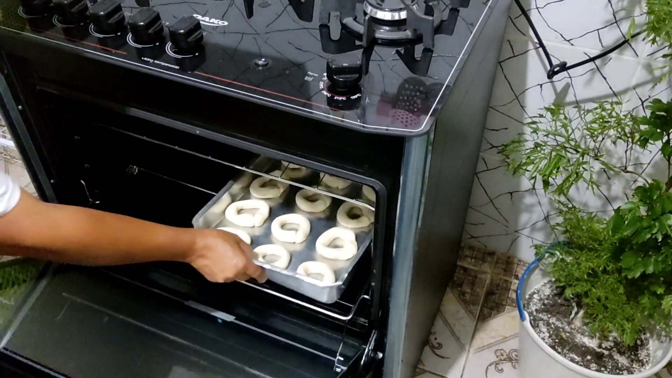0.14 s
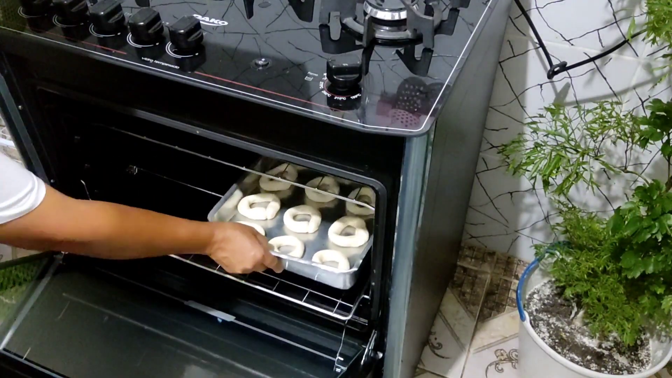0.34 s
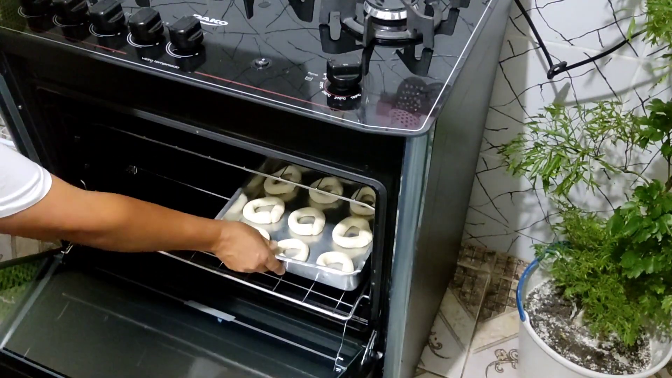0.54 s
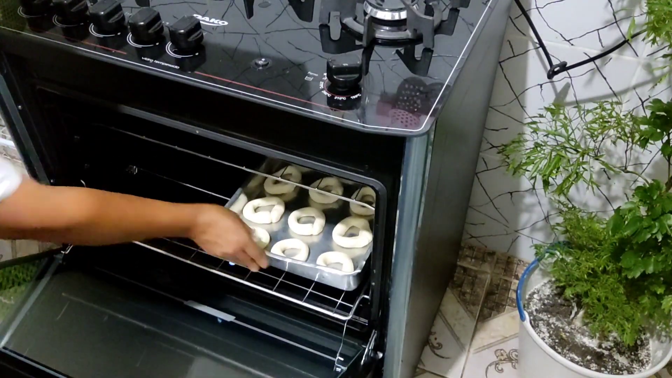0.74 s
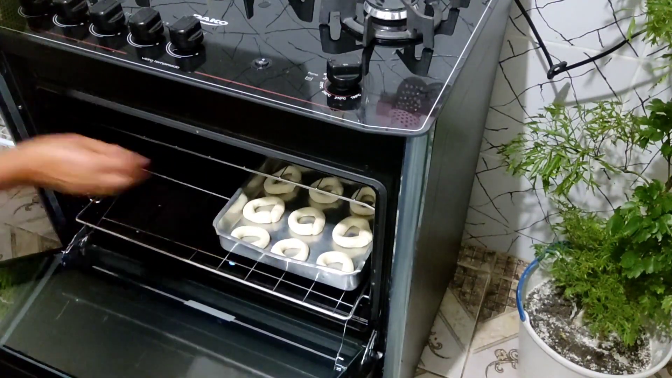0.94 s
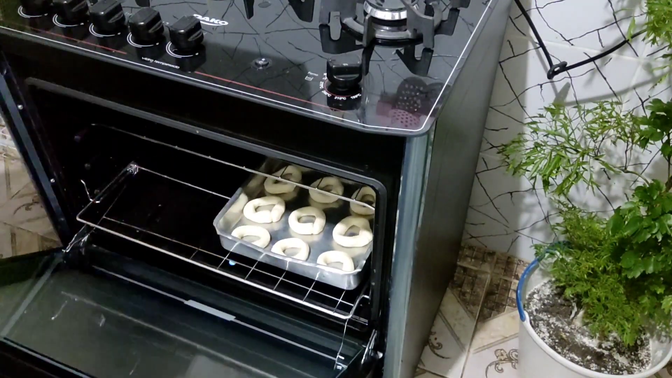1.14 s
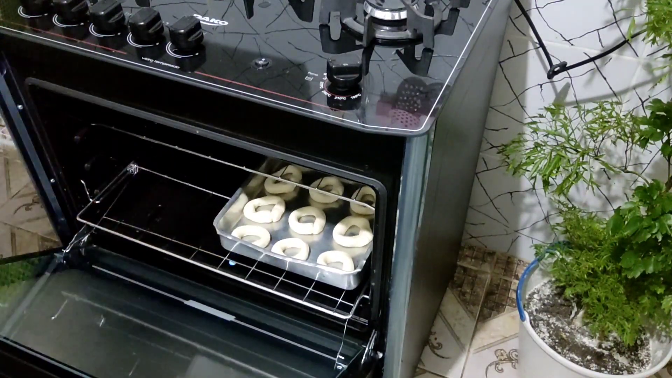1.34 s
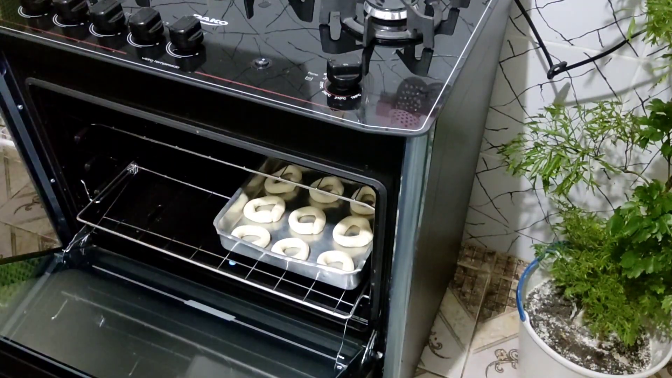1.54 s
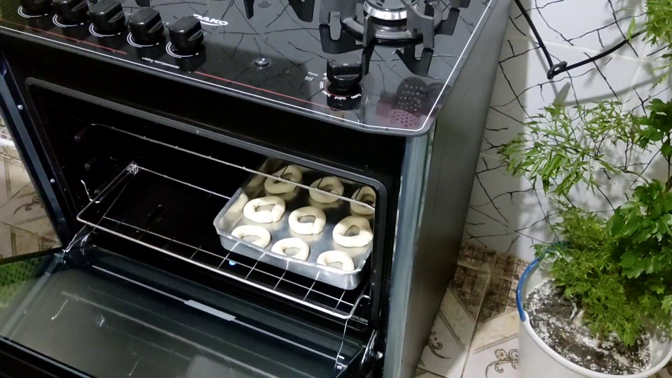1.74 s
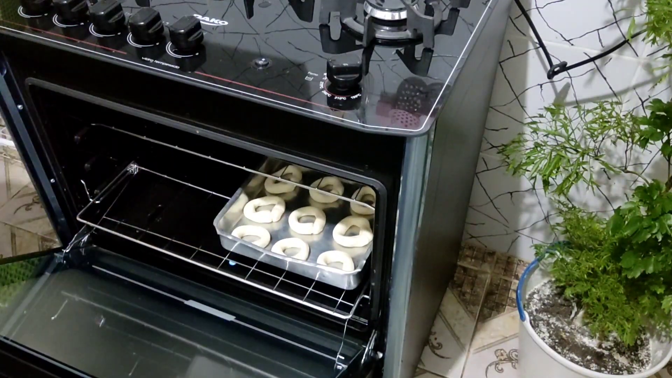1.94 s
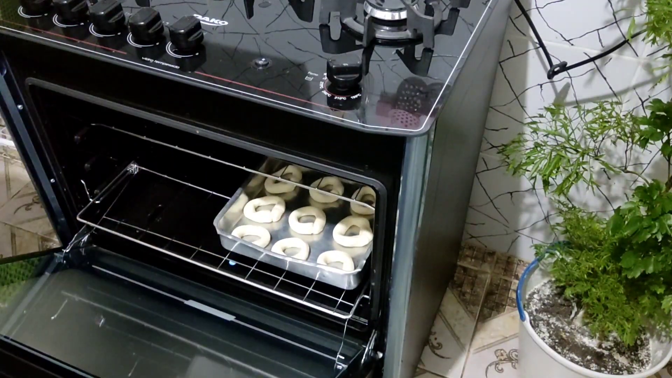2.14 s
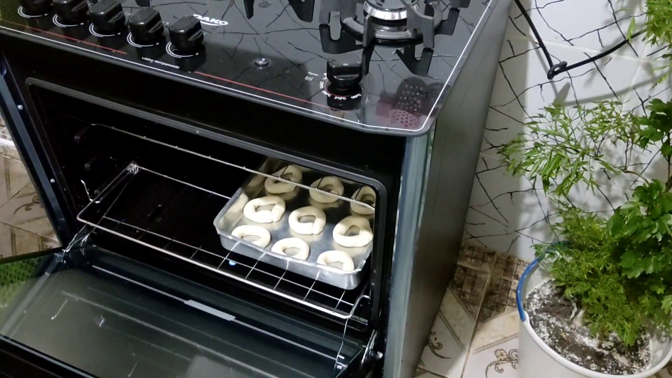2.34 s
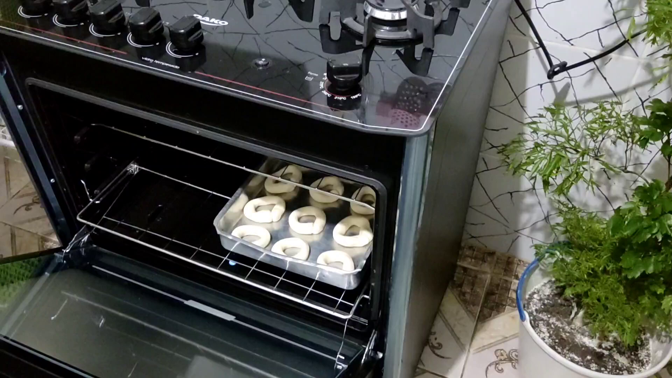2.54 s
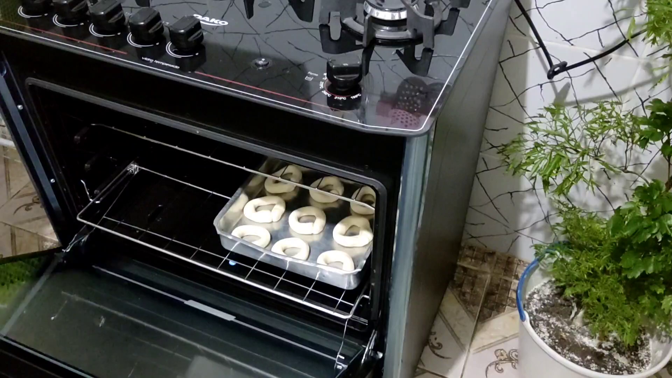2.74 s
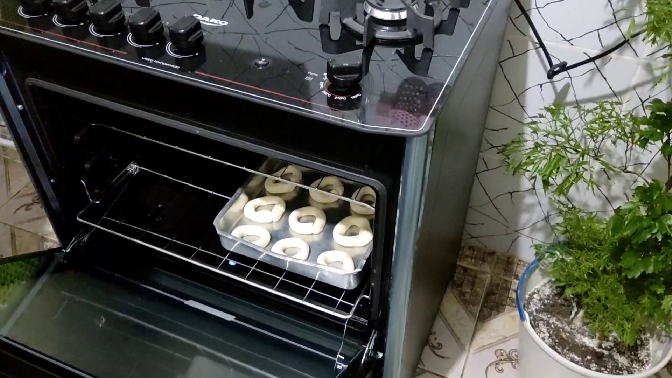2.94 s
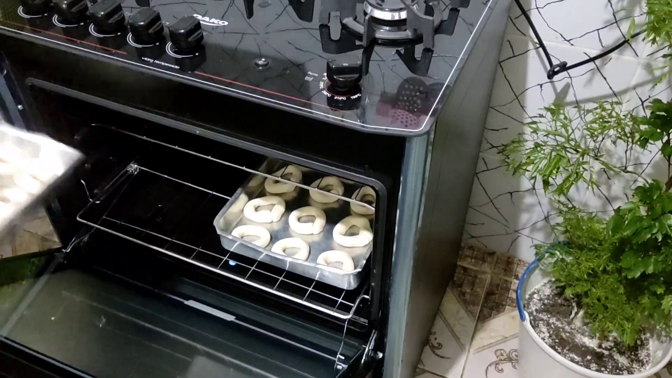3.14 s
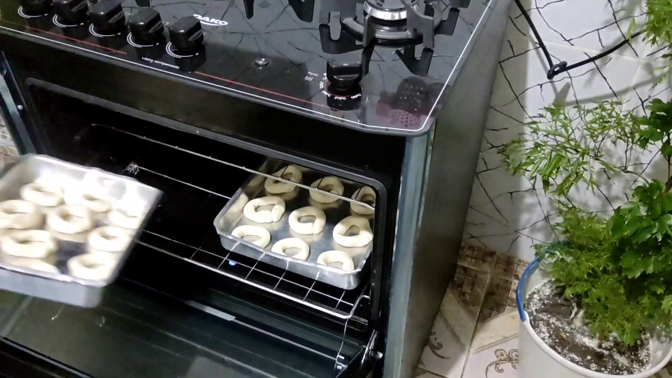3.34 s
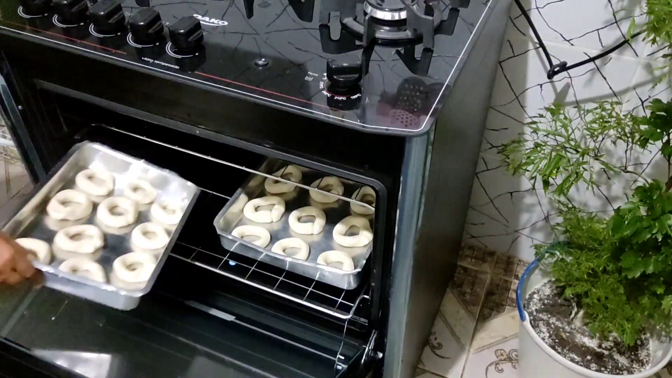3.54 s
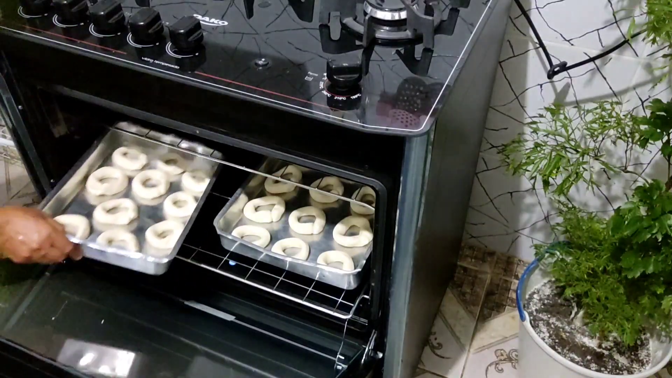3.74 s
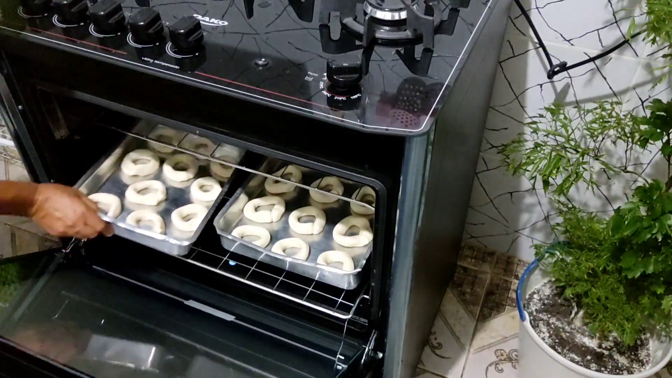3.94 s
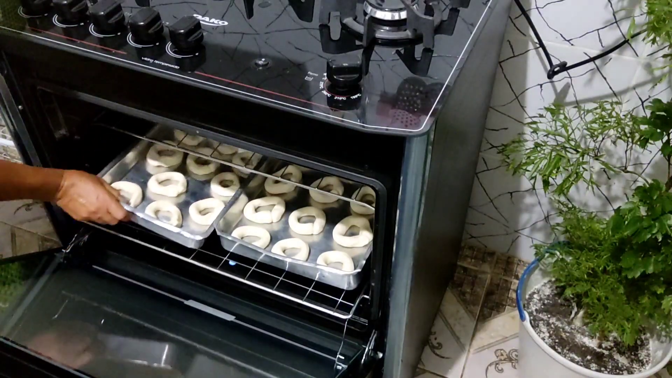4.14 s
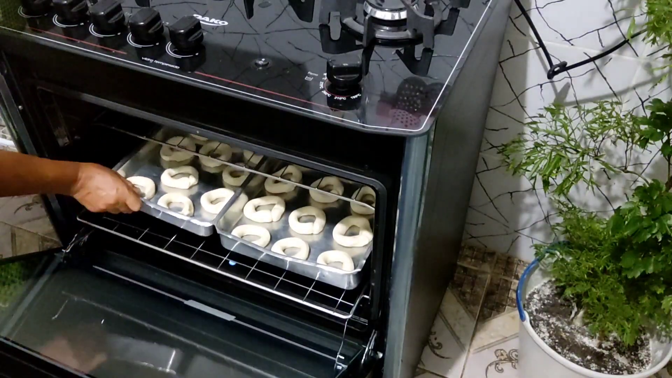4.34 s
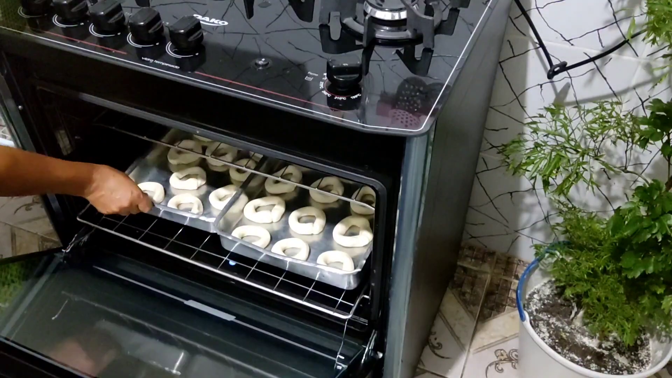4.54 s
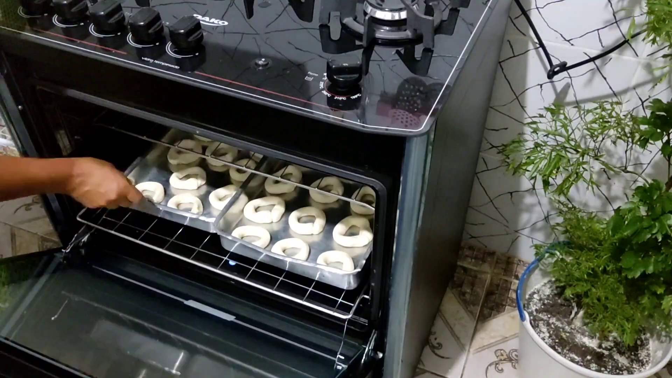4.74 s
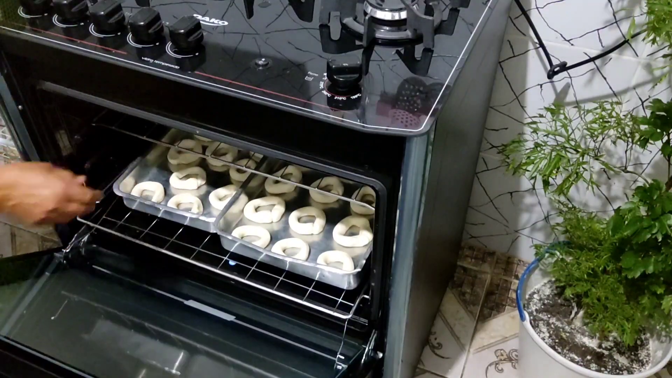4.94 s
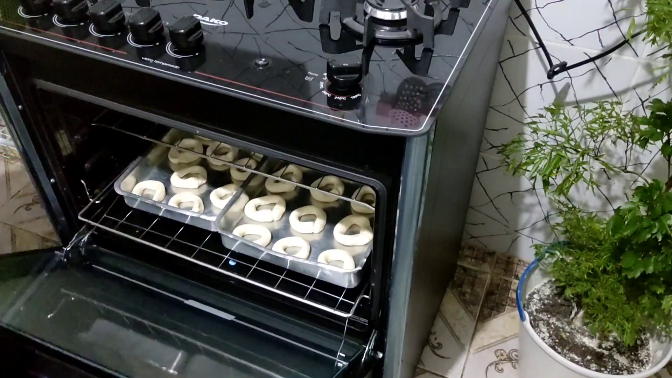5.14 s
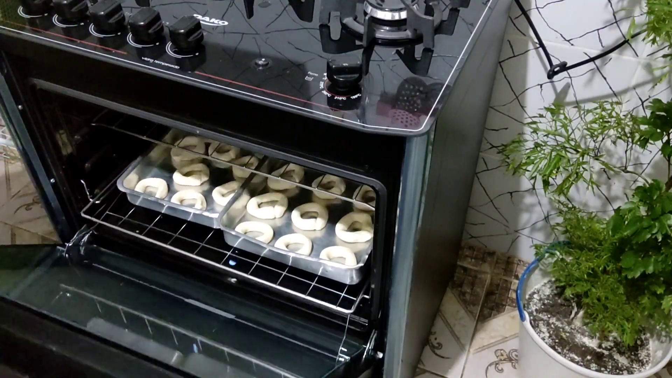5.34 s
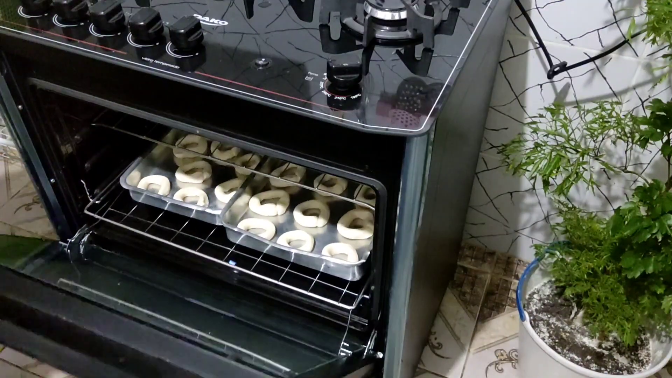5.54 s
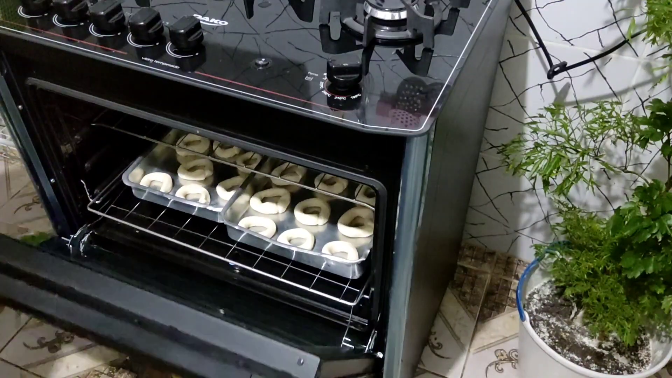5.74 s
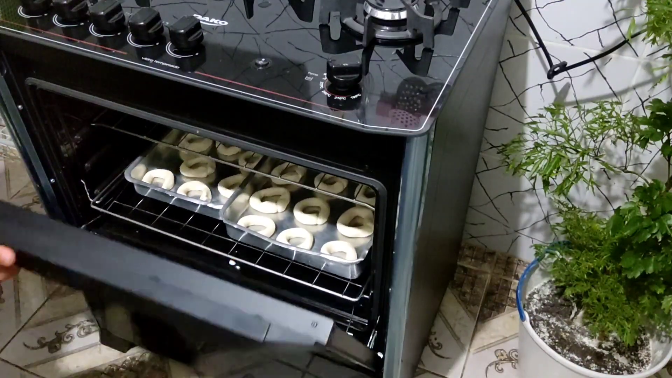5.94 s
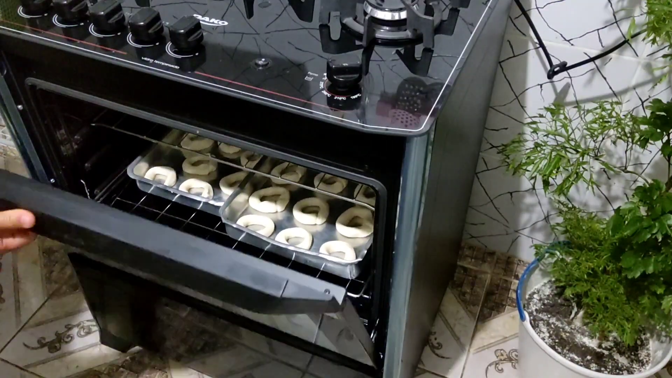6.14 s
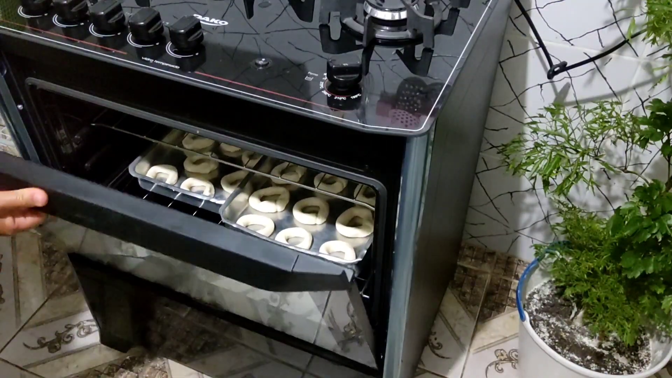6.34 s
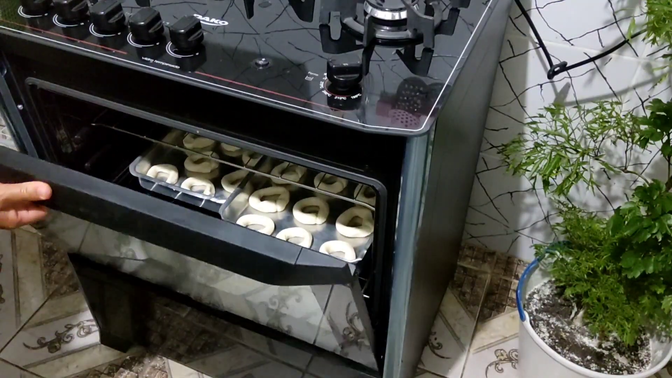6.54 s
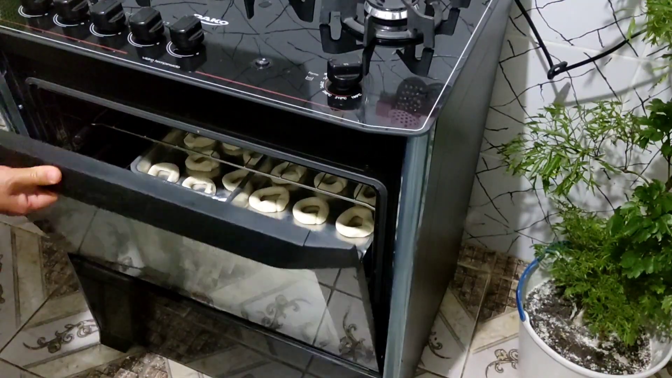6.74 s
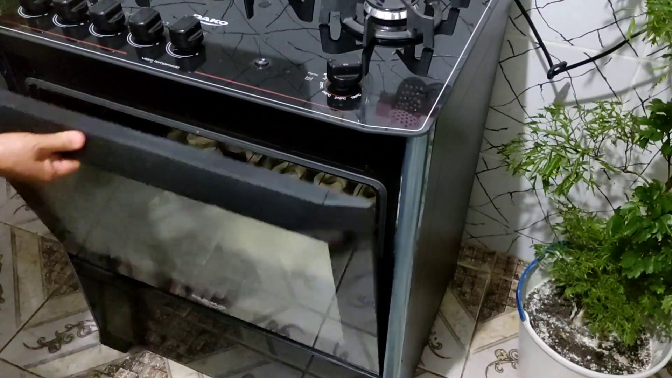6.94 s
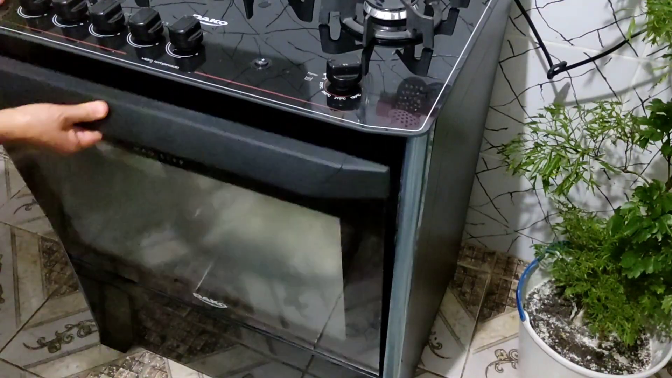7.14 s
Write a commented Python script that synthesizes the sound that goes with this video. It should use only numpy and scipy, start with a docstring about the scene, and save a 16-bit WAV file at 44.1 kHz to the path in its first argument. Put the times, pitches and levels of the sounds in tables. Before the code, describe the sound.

Thin metal tray rattles and slides on oven wires, a sharp off-screen knock, a second tray scrapes in, then quiet door movement.

```python
"""Metal baking trays are set down and slid on the wire rack of an oven, then its door is swung up.
Each blow is a burst of uneven rebounds ringing oven, tray and wires; each slide is dense friction grains.
Something knocks out of sight between the trays, a bare impulse through resonances.
A hard tiled room answers with early arrivals and a decaying noise tail.
Two microphone ports, each with its own treble resonance, hear it over room hiss and air rumble."""
import sys
import numpy as np
from scipy import signal
from scipy.fft import rfft, irfft, next_fast_len
from scipy.io import wavfile
from scipy.ndimage import uniform_filter1d, map_coordinates

SR = 44100
rng = np.random.default_rng(int(sys.argv[2]) if len(sys.argv) > 2 else 0)


def transcribe(u):
    """Save the signal u as a 16-bit wav file named by the first command-line argument.

    u: samples, shape (n,) or (channels, n), limited to [-1, 1]; the rate is SR.
    q: integer samples, one column per channel.
    """
    v = np.clip(np.atleast_2d(u).T, -1, 1)
    q = np.round(v * 32767).astype(np.int16)
    wavfile.write(sys.argv[1], SR, q)


N = 316858  # length in samples

# Contacts of tray, rack and door; levels are for the loudest 10 ms, ahead of the ports.
# Each row: start in seconds, oven boom in dB, boom pitch in Hz, tray clank in dB, wire tick in dB,
# time in seconds for the chatter to fall 60 dB.
CONTACT_EVENTS = [(.077, -29.5, 225, -33, -34, 0.0072), (.16, -38, 240, -46, -25, 0.0038),
                  (.19, -35, 565, -40.5, -44, 0.082), (.249, -35.5, 537, -39.5, -43.5, 0.019),
                  (0.467, -31.5, 207, -26, -21.5, 0.027), (.557, -32, 627, -28.5, -24, 0.0046),
                  (0.604, -29, 264, -22.5, -15, 0.037), (1.298, -63.5, 321, -56, -60, 0.053),
                  (4.076, -58, 700, -39, -36.5, 0.031), (4.142, -38.5, 530, -40.5, -46.5, 0.0032),
                  (4.19, -56, 470, -33.5, -33, 0.047), (4.247, -44.5, 285, -42, -35, 0.039),
                  (4.272, -55, 700, -33.5, -29.5, 0.049), (4.279, -38.5, 219, -41, -22.5, 0.0051),
                  (4.535, -37, 222, -29, -27, 0.061), (4.555, -35, 348, -29.5, -32, 0.042),
                  (5.72, -45, 606, -46.5, -58, 0.011), (5.749, -50, 594.6, -46.5, -47, 0.02),
                  (5.97, -51, 267.2, -51, -56, 0.0086), (6.661, -60.5, 554, -65.5, -61, 0.023),
                  (6.81, -54.5, 500, -53, -61.5, 0.049)]
# Broad ring of the rack wires. Each row: frequency in Hz, relative density in dB per Hz.
WIRE_SPECTRUM = [(2500, -23), (4000, -16), (5500, -2.5), (6300, -5.5), (8000, 2.5), (12000, 0),
                 (15000, -7.5)]
CLEAN_ARRIVAL_DB = -11.5  # each early arrival of a blow without chatter, against the room tail
BLUR_DB_PER_S = 117.5  # early arrivals weaken by this for each second of chatter


def contacts():
    """Each contact booms in the oven shell, clanks in the tray and ticks in the wires."""
    out = np.zeros((2, N + 2 * SR))
    for start, boom_db, boom_hz, clank_db, tick_db, t60 in CONTACT_EVENTS:
        force = chatter(t60)
        answer = room(CLEAN_ARRIVAL_DB - BLUR_DB_PER_S * t60)
        boom = heard(force, answer, oven_shell(boom_hz))
        clank = heard(force, answer, tray_body(tick_db - clank_db))
        tick = heard(force, answer, colour(WIRE_SPECTRUM))
        add(out, start, boom_db, boom)
        add(out, start, clank_db, clank)
        add(out, start, tick_db, tick)
    return out[:, :N]


def chatter(t60):
    """A blow followed by uneven tiny rebounds that die away."""
    t = np.arange(SR // 5) / SR
    rebounds = rng.standard_normal(len(t)) * (rng.random(len(t)) < .07)
    force = rebounds * amp(-60 * t / max(t60, .002))
    force[0] = 2.52  # the first blow
    return force


# Resonances of the oven shell, before the tilt towards the struck spot.
# Each row: centre in Hz, width in Hz, relative level in dB.
OVEN_MODES = [(85, 76, -28), (141.7, 110, -9.5), (177, 65, -8.5), (224.4, 20.3, -1.5), (294, 73, -9),
              (397.4, 85, -0.5), (539, 60, 5.5), (570, 46, 11.5), (684, 95, 1.5)]


def oven_shell(boom_hz):
    """A blow favours the shell modes close to the pitch of the struck spot; the lowest ones always move."""
    favoured = []
    for centre, width, db in OVEN_MODES:
        octaves_away = np.log2(max(centre, 160) / boom_hz)
        favoured.append((centre, width, db - 14 * octaves_away ** 2))
    return modes(favoured)


# Resonances of a tray, before the softness of the contact.
# Each row: centre in Hz, width in Hz, relative level in dB.
TRAY_MODES = [(873, 92, -3.5), (1090, 202, -4), (1523, 1050, -8), (1986, 213, -1.5), (2540, 510, -9.5),
              (3460, 850, -4), (5130, 5600, -11.5)]


def tray_body(hardness_db):
    """A soft contact, with little tick against its clank, drives the upper tray modes less."""
    edge_hz = 5000 * amp(min(hardness_db, 6))
    return lambda f: modes(TRAY_MODES)(f) / (1 + 1j * f / edge_hz) ** 2


# Pushes of a tray along the wires, and a faint shuffle; levels are for full speed, ahead of the room.
# Each row: start in seconds, length in seconds, rub in dB, rumble in dB.
PUSHES = [(.085, 0.11, -61, -39.5), (0.23, .25, -55.5, -47.5), (1.13, 0.092, -60.5, -63),
          (1.29, 0.36, -64.5, -60.5), (4.098, 0.16, -41.5, -46.5), (4.496, 0.049, -44.5, -50.5)]
# The door swings up in two pulls; levels glide from row to row, ahead of the room.
# Each row: time in seconds, hinge rub in dB, rumble in dB.
DOOR_SWING = [(5.099, -98.5, -70.5), (5.4, -68.5, -62), (5.7, -69.5, -62.5), (5.78, -54, -43.5),
              (5.88, -62, -80), (5.95, -52, -49), (6.05, -45, -58.5), (6.22, -49, -73), (6.4, -56, -64),
              (6.58, -67.5, -82), (6.7, -64.5, -61.5), (6.88, -60.5, -58), (7.0, -55, -60.5),
              (7.18, -56.5, -69)]
# Colour of the friction rub. Each row: frequency in Hz, relative density in dB per Hz.
RUB_SPECTRUM = [(300, -23), (1000, -18), (3000, -6.5), (6000, 0.5), (8000, 1.5), (11000, 2), (15000, -3)]
# Colour of the shaken oven shell. Each row: frequency in Hz, relative density in dB per Hz.
SHAKE_SPECTRUM = [(60, -12), (200, -2), (600, -3), (1000, -8), (2500, -15.5), (5000, -21.5)]
RISE, FALL = 0.16, 0.22  # shares of a push spent speeding up and slowing down


def slides():
    """Dense grains of friction hiss, and shake the oven shell."""
    t = np.arange(N) / SR
    times, door_rub_db, door_rumble_db = np.transpose(DOOR_SWING)
    door_moving = t > times[0]
    rub = door_moving * amp(np.interp(t, times, door_rub_db))
    rumble = door_moving * amp(np.interp(t, times, door_rumble_db))
    for start, length, rub_db, rumble_db in PUSHES:
        progress = (t - start) / length
        speed = np.clip(np.minimum(progress / RISE, (1 - progress) / FALL), 0, 1)
        rub = rub + amp(rub_db) * speed
        rumble = rumble + amp(rumble_db) * speed
    rub_sound = rub * unit(filtered(friction_grains(), colour(RUB_SPECTRUM)))
    shake_sound = rumble * unit(filtered(friction_grains(), colour(SHAKE_SPECTRUM)))
    return moving(rub_sound + shake_sound)


def friction_grains():
    """Sparse random impulses, one sample in twenty, as surfaces catch and let go."""
    return rng.standard_normal(N) * (rng.random(N) < .05)


# The knock out of sight, then its late wall echoes; levels are for the loudest 10 ms, ahead of the ports.
# Each row: start in seconds, level in dB.
KNOCK_EVENTS = [(2.037, -17.5), (2.058, -22.5), (2.087, -26)]
# Resonances of the knocked thing; the last two rows are its broad treble, left out of the echoes.
# Each row: centre in Hz, width in Hz, relative level in dB.
KNOCK_MODES = [(455, 160, -18.5), (718, 60, -8), (1200, 131, -2), (1320, 100, -2.5), (1526, 89, -5.5),
               (1900, 42, 6.5), (1887, 15, 11.5), (1975, 180, -2), (2360, 290, -0.5), (2660, 640, -4.5),
               (4430, 8800, -17), (10800, 8000, -18)]


def knock():
    """A dry impulse rings resonances and the room; each late echo is the same ring, duller and central."""
    out = np.zeros((2, N + 2 * SR))
    impulse = np.ones(1)
    start, level_db = KNOCK_EVENTS[0]
    add(out, start, level_db, heard(impulse, room(arrival_db=-15), modes(KNOCK_MODES)))
    central = np.pad(np.ones((2, 1)), ((0, 0), (0, SR // 10)))  # one reflection, alike on both ports
    for start, level_db in KNOCK_EVENTS[1:]:
        add(out, start, level_db, heard(impulse, central, modes(KNOCK_MODES[:-2])))
    return out[:, :N]


# Decay of the tiled room's tail. Each row: frequency in Hz, time in seconds to fall 60 dB.
ROOM_DECAY = [(100, 2.12), (260, 1.13), (700, 0.77), (1800, 0.7), (5000, 0.62), (13000, 0.42)]
# Stereo width of the room. Each row: frequency in Hz, left-right likeness from 0 to 1.
ROOM_LIKENESS = [(60, 0.71), (130, 1), (290, 0.9), (640, 0.45), (1400, 0.05), (15000, 0.026)]


def room(arrival_db):
    """A fresh stereo answer: the direct sound, a few near walls, then a tail dying by band."""
    hz, t, z = signal.stft(rng.standard_normal((2, SR)), SR, nperseg=256)
    fade = amp(-60 * t / along(ROOM_DECAY, hz)[:, None])
    fade = fade * (1 + 0.5 * amp(-60 * t / 0.2))  # a fuller start
    tail = signal.istft(z * fade, SR, nperseg=256)[1][:, :SR]
    tail = tail * np.clip(np.arange(SR) / SR / 0.0046, 0, 1)  # builds up over 4.6 ms
    tail = tail / np.linalg.norm(tail[0])
    wall_lag = (SR * .008 * rng.random((2, 6))).astype(int)
    wall_lag = wall_lag * (np.arange(6) > 0)  # the first of six is the direct sound
    lag = wall_lag + rng.integers(0, 8, (2, 1))  # small offset between ports, in samples
    arrivals = np.zeros_like(tail)
    np.put_along_axis(arrivals, lag, amp(arrival_db) * rng.choice([-1, 1], (2, 6)), axis=1)
    return paired(tail + arrivals, ROOM_LIKENESS)


def moving(dry):
    """The room answers a moving source afresh every eighth of a second."""
    out, step = np.zeros((2, N + 2 * SR)), SR // 8
    for i in range(0, N, step):
        piece = dry[i:i + step]
        if np.abs(piece).max() > 0:
            wet = signal.fftconvolve(piece[None], room(arrival_db=-12.5), axes=1)
            out[:, i:i + wet.shape[1]] += wet
    return out[:, :N]


# Colour of the hiss, ahead of the ports. Each row: frequency in Hz, density in dB per Hz.
HISS_SPECTRUM = [(40, -95), (65, -87), (110, -86.5), (180, -93), (350, -92.5), (800, -99), (1500, -103),
                 (3000, -106), (6000, -107), (10000, -107), (15000, -108)]
# Stereo width of the hiss. Each row: frequency in Hz, left-right likeness from 0 to 1.
HISS_LIKENESS = [(60, 0.85), (290, 0.12), (640, 0.2), (1400, 0), (15000, 0)]


def hiss():
    """The quiet room: air and far traffic as coloured noise, slightly patchy in time and pitch."""
    z = signal.stft(rng.standard_normal((2, N)), nperseg=1024)[2]
    field = uniform_filter1d(rng.standard_normal(z.shape[1:]), 5, 0)
    field = uniform_filter1d(field, 8, 1)
    patches = amp(unit(field))  # 1 dB rms
    patchy = signal.istft(z * patches, nperseg=1024)[1][:, :N]
    return np.sqrt(SR / 2) * filtered(paired(patchy, HISS_LIKENESS), colour(HISS_SPECTRUM))


# Colour of the air rumble, before its lumps. Each row: frequency in Hz, density in dB per Hz.
BUFFET_SPECTRUM = [(10, -66), (30, -79.5), (60, -80.5), (120, -105), (400, -140)]


def buffet():
    """Moving air rumbles in lumps, apart on each port: low noise under a smooth random level."""
    knots = np.arange(N) * 6 / SR  # six random levels a second
    lumps = []
    for _ in range(2):
        levels = rng.standard_normal(int(knots[-1]) + 4)
        lumps.append(amp(4.9 * map_coordinates(levels, [knots])))
    return np.sqrt(SR / 2) * filtered(lumps * rng.standard_normal((2, N)), colour(BUFFET_SPECTRUM))


def amp(db):
    """Decibels to amplitude."""
    return 10 ** (np.asarray(db) / 20)


def unit(x):
    """Scales a signal to an rms of 1."""
    return x / np.sqrt(np.mean(x ** 2) + 1e-20)


def along(points, hz):
    """Reads (Hz, value) points on a log frequency axis."""
    f, v = np.transpose(points)
    return np.interp(np.log(hz + 1), np.log(f + 1), v)


def filtered(x, response):
    """Shapes a sound by a complex response of frequency."""
    m = next_fast_len(x.shape[-1] + SR // 4)
    spectrum = rfft(x, m) * response(np.fft.rfftfreq(m, 1 / SR))
    return irfft(spectrum, m)[..., :x.shape[-1]]


def modes(table):
    """Causal response of a set of resonances with alternating signs."""
    def response(f):
        total = 0
        for k, (centre, width, db) in enumerate(table):
            damping = 1j * f * width
            total = total + (-1) ** k * amp(db) * damping / (centre * centre - f * f + damping)
        return total
    return response


def colour(table):
    """Broad response read from spectrum points."""
    return lambda f: amp(along(table, f))


def paired(pair, likeness):
    """Mixes two unrelated signals to a left-right likeness that varies with frequency."""
    def mid_side(hz):
        turn = np.arccos(np.clip(along(likeness, hz), -1, 1)) / 2
        return np.array([np.cos(turn), np.sin(turn)])
    mid, side = filtered(pair, mid_side)
    return np.array([mid + side, mid - side])


def heard(force, answer, body):
    """A force on a body as the room returns it, with 10 ms of lead."""
    wet = signal.fftconvolve(np.pad(force, (SR // 100, 0))[None], answer, axes=1)
    return filtered(wet, body)


def add(out, start, db, sound):
    """Places a sound, less its 10 ms lead, so that its loudest 10 ms have the given level."""
    loudest = np.sqrt(uniform_filter1d(np.mean(sound ** 2, 0), SR // 100).max())
    i = round(start * SR) - SR // 100
    out[:, i:i + sound.shape[1]] += amp(db) * sound / loudest


def scene():
    """Sums the layers, from the trays and door down to the background."""
    return contacts() + slides() + knock() + hiss() + buffet()


# The microphone ports, left then right. Each row: resonance in Hz, width in Hz,
# level of the resonance added to the flat sound in dB, overall sensitivity in dB.
PORT_RESONANCES = [(11500, 1810, 0.5, 0.5), (9150, 675, 9.5, 1)]
TOP_HZ, CEILING = 14400, .9  # band limit; level that the loudest peaks bend towards


def record(dry):
    """Each port lifts its own treble band, the loudest peaks are rounded, the top is cut at the band limit."""
    def port_response(hz):
        return np.array([amp(db) * (1 + modes([peak])(hz)) for *peak, db in PORT_RESONANCES])
    ports = filtered(dry, port_response)
    rounded = ports / (1 + np.abs(ports / CEILING) ** 6) ** (1 / 6)
    return filtered(rounded, lambda hz: 1 / (1 + (hz / TOP_HZ) ** 300))


dry = scene()
out = record(dry)
transcribe(out)
```